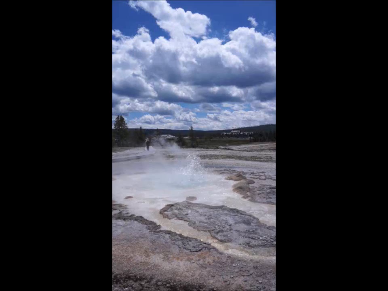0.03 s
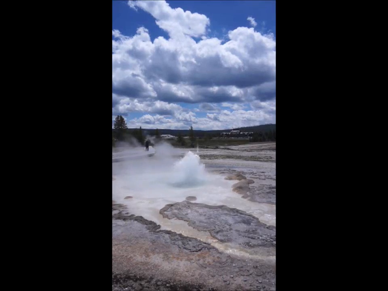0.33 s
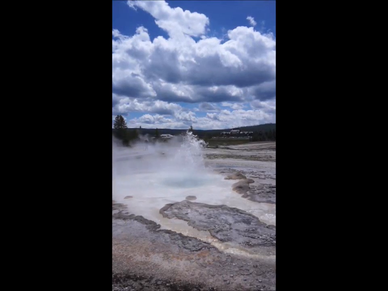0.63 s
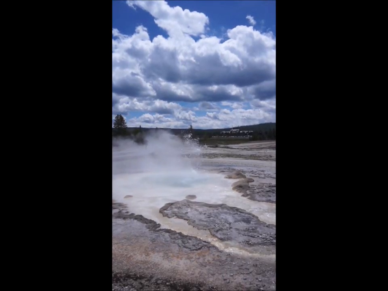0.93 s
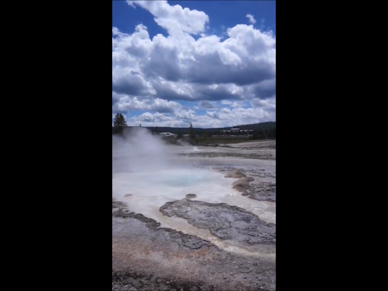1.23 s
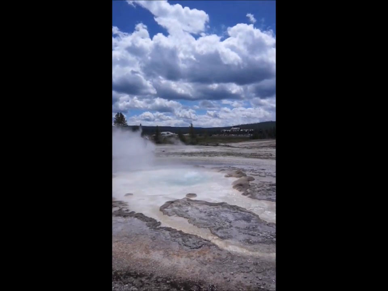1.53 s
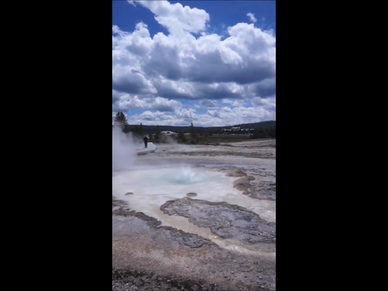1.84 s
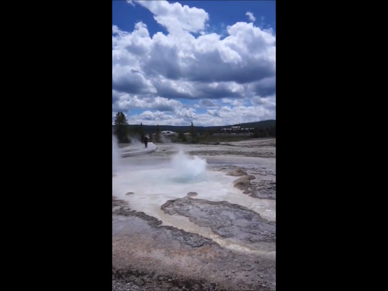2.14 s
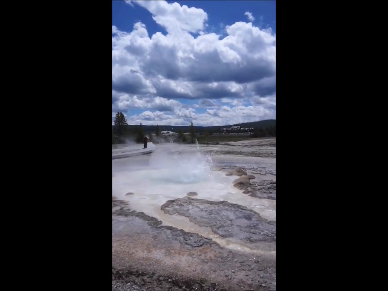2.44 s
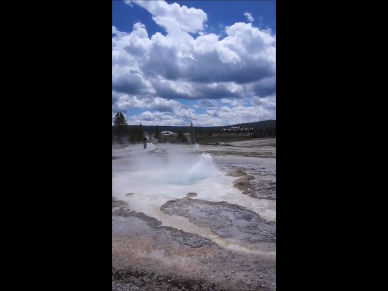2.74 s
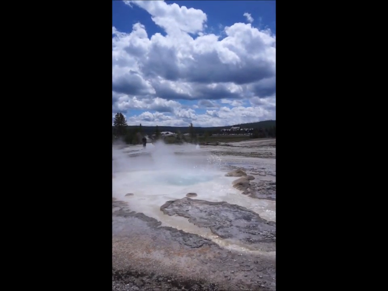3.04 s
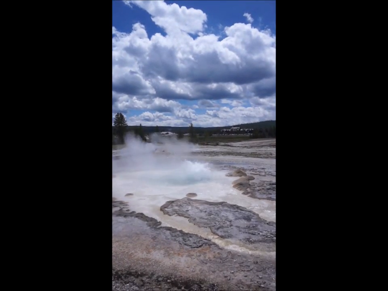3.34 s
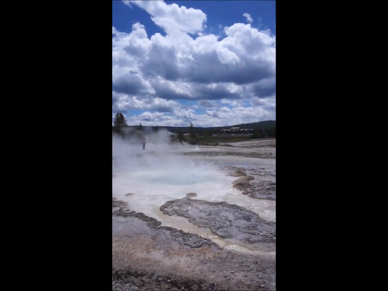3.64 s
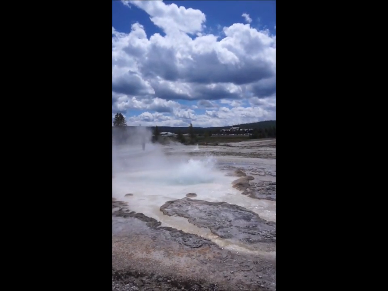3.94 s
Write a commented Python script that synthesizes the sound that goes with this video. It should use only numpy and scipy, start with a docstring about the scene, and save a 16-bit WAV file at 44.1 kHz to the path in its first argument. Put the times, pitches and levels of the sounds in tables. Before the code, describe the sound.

Bubbling water heaves and splashes in a nearby geothermal pool on open, rocky ground. Wind thumps on the microphone as the water settles a little, then stronger surges throw spray and plopping water, the biggest at the end.

```python
"""Hot spring in wind

A pool boils up in surges a few metres away: bubbles gurgle as it heaves, thrown water splashes and
plops back, spray patters down. The water also arrives off hard, flat ground, which hollows it at
evenly spaced pitches. Wind rumbles on the microphones; eddies buffet them in short, ragged bursts."""
import sys
import numpy as np
from scipy import signal
from scipy.fft import rfft, irfft
from scipy.io import wavfile

SR = 44100
rng = np.random.default_rng(int(sys.argv[2]) if len(sys.argv) > 2 else 0)


def dump_mix(stems):
    """Bounce the given channels to the path in sys.argv[1] as a 16-bit WAV at rate SR."""
    frames = np.atleast_2d(stems).T  # one column per channel
    limited = np.clip(frames, -1, 1)  # hard clip at full scale
    pcm = np.round(limited * 32767).astype(np.int16)
    wavfile.write(sys.argv[1], SR, pcm)


N = 176400
T, HZ = np.arange(N) / SR, np.fft.rfftfreq(N, 1 / SR)

# pool surges (start [s], hold [s], slosh [dB], splash [dB], spray [dB])
POOL_SURGES = [(0.134, 0.089, -32, -48, -49), (0.38, 0.13, -48, -54, -58), (0.822, 0.25, -45, -49, -52.5),
               (1.28, 0.039, -52, -49, -51.5), (1.707, 0.0094, -36.5, -44, -56.5),
               (1.971, 0.049, -34, -40, -48), (2.42, 0.065, -42, -41, -45.5),
               (2.493, 0.098, -40, -42.5, -43.5), (2.646, 0.18, -39, -39.5, -42.5),
               (3.168, 0.097, -32, -41, -57), (3.224, 0.036, -57, -62, -42.5),
               (3.707, 0.048, -53, -36, -42), (3.773, 0.059, -29.5, -34.5, -39)]
# simmer under the surges (time [s], slosh [dB], splash [dB], spray [dB])
POOL_SIMMER = [(.08, -44, -49.5, -55), (.3, -43.5, -43, -47.5), (.71, -44, -53, -52.5),
               (1.42, -38, -50, -49), (1.56, -43.5, -53, -59), (1.96, -35, -50.5, -65),
               (2.25, -42, -48, -52), (3.05, -36.5, -43, -45.5), (3.52, -40, -44.5, -49),
               (4, -36, -39.5, -42)]
# lumps of water falling back (start [s], length [s], level [dB])
PLOPS = [(2.44, 0.031, -35), (2.51, 0.023, -34.5), (3.34, 0.033, -37), (3.391, 0.0085, -29.5),
         (3.721, 0.012, -28), (3.786, 0.0042, -28)]
# drops on water (time [s], level [dB], pitch [Hz])
WATER_DROPS = [(.587, -33, 2550), (0.725, -40, 2940), (1.351, -34, 2000), (1.408, -35.5, 1970)]
# drops on rock (time [s], level [dB])
ROCK_TICKS = [(1.421, -35), (3.25, -30.5), (3.301, -41)]
# water layer spectra (frequency [Hz], gain [dB])
SLOSH_EQ_DB = [(60, 9), (180, -8.5), (380, 5.5), (600, 2.5), (780, 1.5), (1150, -2.5), (1400, -11.5),
               (1800, -8), (3000, -50)]
SPLASH_EQ_DB = [(700, -2), (1200, 8), (1550, -7), (1950, 3), (2700, -2.5), (3550, -5), (4200, -20.5),
                (6000, -19), (10000, -75)]
SPRAY_EQ_DB = [(2500, 0.5), (4300, -1.5), (5200, -3), (5750, -5.5), (6600, 1), (7500, -2.5), (8500, 3.5),
               (10500, -4.5), (12500, -13.5), (14000, -23), (15000, -49)]
# ground reflection (frequency [Hz], gain [ratio])
GROUND_GAIN = [(200, 0.058), (580, 0.87), (1450, 0.2), (2300, 0.49), (3200, 0.54), (4500, 0.23),
               (7000, 0.017)]
# water, left-right likeness (frequency [Hz], coherence [0-1])
WATER_COHERENCE = [(100, .85), (800, .97), (1250, .95), (2000, .76), (3400, .78), (5000, .42), (9000, .35),
                   (14000, .3)]
# water, balance (frequency [Hz], left minus right [dB])
WATER_BALANCE_DB = [(1200, 0), (1520, -6.5), (1900, 4.5), (2700, 4), (3300, 1), (3800, -4.5), (4600, 4),
                    (6000, 3.5), (8500, 10), (14000, 11.5)]
# water, phase difference (frequency [Hz], left lead [rad])
WATER_LEAD_RAD = [(1300, -.1), (1640, .9), (2100, .3), (3700, 0), (4300, 1.8), (5250, .7), (6400, 1.8),
                  (9000, 1.3)]
# eddies hitting the microphones (start [s], length [s], level [dB])
EDDIES = [(0.067, 0.023, -33.5), (0.142, 0.0058, -26.5), (0.408, 0.015, -30.5), (0.441, 0.025, -29),
          (0.547, 0.046, -29.5), (0.613, 0.029, -31.5), (0.651, 0.013, -24.5), (0.719, 0.059, -35.5),
          (0.91, 0.078, -27), (0.947, 0.056, -27.5), (1.016, 0.0095, -21), (1.029, 0.07, -26.5),
          (1.176, 0.065, -26.5), (1.2, 0.012, -19.5), (1.232, 0.01, -19), (1.245, 0.014, -17.5),
          (1.351, 0.051, -22), (1.412, 0.053, -24), (1.478, 0.015, -19.5), (1.504, 0.0095, -24),
          (1.643, 0.031, -27), (1.681, 0.39, -28), (1.77, 0.04, -24), (1.89, 0.0086, -21),
          (1.987, 0.046, -22), (2.135, 0.013, -25), (2.154, 0.013, -18), (2.185, 0.011, -19.5),
          (2.961, 0.12, -34), (3.533, 0.1, -30), (3.647, 0.011, -21.5), (3.661, 0.027, -25.5),
          (3.685, 0.051, -26)]
# large eddies (start [s], peak [dB], pitch [Hz])
LARGE_EDDIES = [(1.454, -19, 106), (2.119, -20.5, 64), (3.661, -15, 111)]
# steady wind (time [s], level [dB])
BREEZE_DB = [(0, -44), (.8, -40), (1.1, -35), (1.58, -39), (2.1, -33), (2.4, -37.5), (3.2, -39),
             (3.45, -43), (3.7, -38), (4, -42)]
# steady wind spectrum (frequency [Hz], gain [dB])
BREEZE_EQ_DB = [(10, -14), (25, -19.5), (70, 1.5), (130, 4.5), (250, -2), (450, -13.5), (900, -14),
                (3000, -54)]
# steady wind, left-right likeness (frequency [Hz], coherence [0-1])
BREEZE_COHERENCE = [(40, 0.83), (110, 0.89), (200, 0.51), (400, 0.093), (800, 1)]


def slosh():
    """Large bubbles burst as the pool heaves."""
    grains = [bubbles(251, 1626, per_s=900, decay_cycles=4.45) for _ in range(2)]
    gurgle = water(grains, wash_db=5.5, eq_db=SLOSH_EQ_DB)
    return gurgle * surges(layer=0, lag_s=0.0011, rise_s=0.0083, fall_db_per_s=85)


def splash(balance_db=-1.1):
    """Thrown water showers back into the pool."""
    grains = [bubbles(1209, 4520, per_s=1200, decay_cycles=5.4) for _ in range(2)]
    shower = water(grains, wash_db=8.5, eq_db=SPLASH_EQ_DB)
    pan = amp([[balance_db / 2], [-balance_db / 2]])
    return shower * surges(layer=1, lag_s=0.003, rise_s=0.056, fall_db_per_s=129) * pan


def spray(wash_db=6, ticks_per_s=70, tick_over_wash_db=9, flutter_db=0.84):
    """Fine droplets fizz; scattered larger ones tick on the rock."""
    grains = [bubbles(3950, 14840, per_s=4000, decay_cycles=4.8, spread_db=3.5) for _ in range(2)]
    ticks = amp(wash_db + tick_over_wash_db + size_scatter()) * np.sign(rng.standard_normal(N))
    grains[0] += ticks * (rng.random(N) < ticks_per_s / SR)
    fizz = water(grains, wash_db, SPRAY_EQ_DB) * amp(flutter_db * waver(corner_hz=68.6))
    return fizz * surges(layer=2, lag_s=0.0028, rise_s=0.056, fall_db_per_s=150)


def plops(rise_s=0.003, decay_s=0.013):
    """Lumps of water fall into the pool, each trapping a cluster of ringing bubbles."""
    grains = [bubbles(660, 1050, per_s=2300, decay_cycles=4.6) for _ in range(2)]
    envelope = np.zeros(N)
    for start_s, length_s, db in PLOPS:
        t = T - start_s
        envelope += amp(db) * np.clip(t / rise_s, 0, 1) * np.exp(-np.maximum(t - length_s, 0) / decay_s)
    return water(grains, wash_db=5, eq_db=SLOSH_EQ_DB) * envelope


def surges(layer, lag_s, rise_s, fall_db_per_s):
    """Envelope of one water layer: simmer plus each surge's rise, hold and fall, summed in power."""
    power = amp(by_time(POOL_SIMMER)[layer]) ** 2
    for start_s, hold_s, *levels_db in POOL_SURGES:
        t = T - start_s - lag_s
        fall_db = fall_db_per_s * np.maximum(t - rise_s - hold_s, 0)
        power += (np.clip(t / rise_s, 0, 1) * amp(levels_db[layer] - fall_db)) ** 2
    return np.sqrt(power)


def bubbles(low_hz, high_hz, per_s, decay_cycles, spread_db=0, glide=0.011, pitches=40):
    """Bubbles ring at random times, each gliding up as it dies; rms 1."""
    out = np.zeros(N)
    for hz in np.linspace(low_hz, high_hz, pitches):
        hz *= rng.uniform(.98, 1.02)
        age = np.arange(0, 5, hz / (decay_cycles * SR))  # in decay times
        envelope = np.exp(-age) * (1 - np.exp(-8 * age))
        ring = envelope * np.sin(2 * np.pi * decay_cycles * age * (1 + glide * age))
        onsets = rng.random(N) < per_s / pitches / SR
        kicks = onsets * amp(spread_db * size_scatter())
        out += signal.oaconvolve(kicks, ring / np.linalg.norm(ring))[:N]
    return unit_rms(out)


def water(grains, wash_db, eq_db, echo_s=0.0011656, echo_rad=1):
    """Grains over a wash of countless finer ones, combed by the ground echo, at two microphones."""
    source = np.array(grains) + amp(wash_db) * rng.standard_normal((2, N))
    ground = 1 + by_hz(GROUND_GAIN) * np.exp(1j * (echo_rad - 2 * np.pi * HZ * echo_s))
    left = amp(by_hz(WATER_BALANCE_DB) / 2) * np.exp(.5j * by_hz(WATER_LEAD_RAD))
    spectra = stereo(rfft(source), WATER_COHERENCE) * amp(by_hz(eq_db))
    heard = irfft(spectra * ground * np.array([left, 1 / left]), N)
    return heard / heard.mean(0).std()


def drops(ring_s=0.0018, tick_s=0.0011):
    """Stray drops plink in water or tick on rock nearby, left of centre."""
    out, t = np.zeros(N), T[:SR // 20]
    for start_s, db, hz in WATER_DROPS:
        add(out, start_s, amp(db) * t / ring_s * np.exp(1 - t / ring_s) * np.sin(2 * np.pi * hz * t))
    for start_s, db in ROCK_TICKS:
        spatter = unit_rms(irfft(rfft(rng.standard_normal(N)) * amp(by_hz(SPRAY_EQ_DB)), N))
        add(out, start_s, amp(db) * np.exp(-t / tick_s) * spatter[:len(t)])
    return out * amp([[0], [-5]])


def buffets(ref_rise_s=0.0029, ref_length_s=0.053, decay_s=0.006, skew=0.12):
    """Each eddy hits the microphones as a short, spiky burst of pressure."""
    out, t = np.zeros((2, N)), T[:SR // 2]
    for start_s, length_s, db in EDDIES:
        swirl = eddy(db, len(t))
        rise_s = ref_rise_s * (length_s / ref_length_s) ** .5
        envelope = (1 - np.exp(-t / rise_s)) * np.exp(-np.maximum(t - length_s, 0) / decay_s)
        burst = (swirl + skew * (swirl ** 2 - 1)) * envelope
        burst *= np.linalg.norm(envelope) / np.linalg.norm(burst, axis=1, keepdims=True)
        add(out, start_s, amp(db) * burst)
    return out * amp([[.4], [-.4]])


def eddy(db, samples, ref_hz=315, ref_db=-24, db_per_octave=11, coherence=0.93):
    """Turbulence sweeps past one microphone, then the other; stronger eddies are brighter."""
    hz = np.fft.rfftfreq(samples, 1 / SR)
    edge_hz = ref_hz * 2 ** ((db - ref_db) / db_per_octave)
    low_cut = hz / np.hypot(hz, 104) * hz / np.hypot(hz, 35.7)
    high_cut = 1 / np.hypot(1, (hz / edge_hz) ** 2.8)
    right, unrelated = rfft(rng.standard_normal((2, samples))) * low_cut * high_cut
    lag_s = rng.normal(.0002, .00025)
    left = coherence * right * np.exp(-2j * np.pi * hz * lag_s) + np.sqrt(1 - coherence ** 2) * unrelated
    return unit_rms(irfft(np.array([left, right]), samples))


def thumps(cycles=2.6):
    """A large eddy pushes on both microphones at once: a few deep, smooth swings."""
    out = np.zeros(N)
    for start_s, db, hz in LARGE_EDDIES:
        turns = np.arange(0, cycles, hz / SR)
        add(out, start_s, amp(db) * np.hanning(len(turns)) * np.sin(2 * np.pi * (turns + rng.random())))
    return out


def breeze():
    """Steady wind rumbles under the eddies."""
    spectra = stereo(rfft(rng.standard_normal((2, N))), BREEZE_COHERENCE)
    rumble = irfft(spectra * amp(by_hz(BREEZE_EQ_DB)), N)
    return unit_rms(rumble) * amp(by_time(BREEZE_DB)[0])


def amp(db):
    """Decibels to gain."""
    return 10 ** (np.asarray(db) / 20)


def unit_rms(x):
    """Scales to rms 1."""
    return x / np.sqrt(np.mean(x ** 2) + 1e-20)


def by_hz(rows):
    """Interpolates a table over log frequency."""
    hz, values = np.transpose(rows)
    return np.interp(np.log(HZ + 1), np.log(hz + 1), values)


def by_time(rows):
    """Interpolates each column over time."""
    times_s, *columns = np.transpose(rows)
    return [np.interp(T, times_s, column) for column in columns]


def add(mix, start_s, sound):
    """Mixes a sound in, in place."""
    part = mix[..., max(round(start_s * SR), 0):][..., :sound.shape[-1]]
    part += sound[..., :part.shape[-1]]


def size_scatter():
    """Exponential draws capped at 4: many small, few large."""
    return np.minimum(-np.log(1 - rng.random(N)), 4)


def waver(corner_hz):
    """Noise above 4 Hz, rolled off at the corner; rms 1."""
    return unit_rms(irfft(rfft(rng.standard_normal(N)) * (HZ > 4) / (1 + (HZ / corner_hz) ** 2), N))


def stereo(spectra, coherence_rows):
    """Blends two unrelated spectra into left and right."""
    coherence = np.clip(by_hz(coherence_rows), 0, 1)
    mid = spectra[0] * np.sqrt((1 + coherence) / 2)
    side = spectra[1] * np.sqrt((1 - coherence) / 2)
    return np.array([mid + side, mid - side])


def scene():
    """Spring plus wind."""
    return slosh() + plops() + splash() + spray() + drops() + buffets() + thumps() + breeze()


def record(dry):
    """Quick fade-in, then low-pass."""
    fade_span_s, cutoff_hz = (.045, .07), 14900
    faded = dry * np.interp(T, fade_span_s, [0, 1])
    low_pass = signal.firwin(511, cutoff_hz, window=("kaiser", 9), fs=SR)
    return signal.oaconvolve(faded, low_pass[None], "same")


dry = scene()
out = record(dry)
dump_mix(out)
```